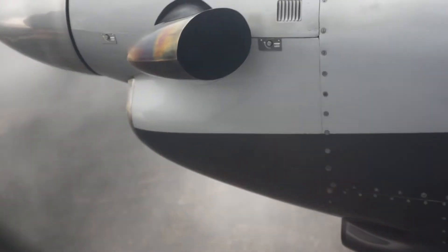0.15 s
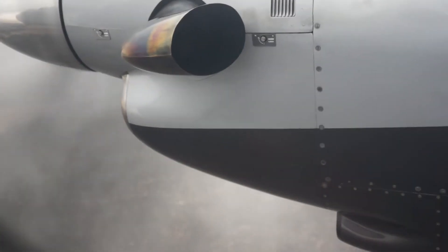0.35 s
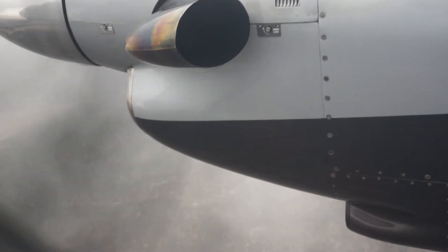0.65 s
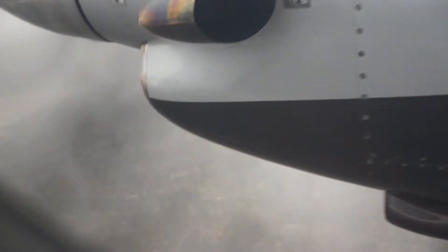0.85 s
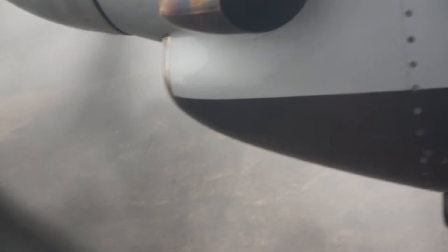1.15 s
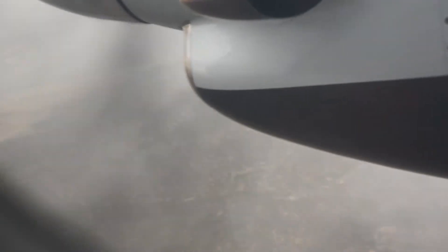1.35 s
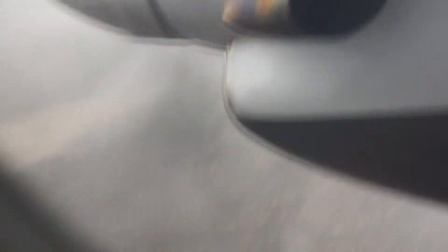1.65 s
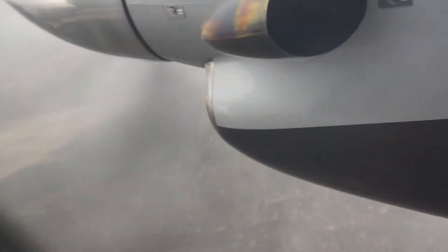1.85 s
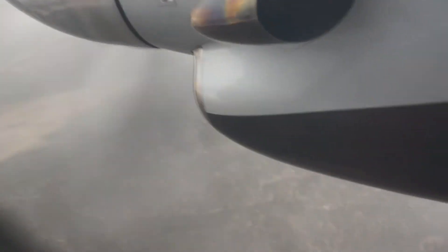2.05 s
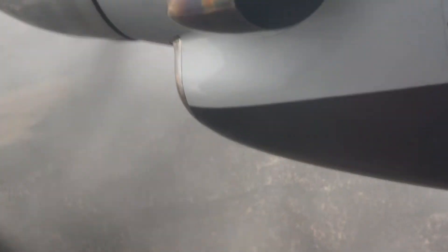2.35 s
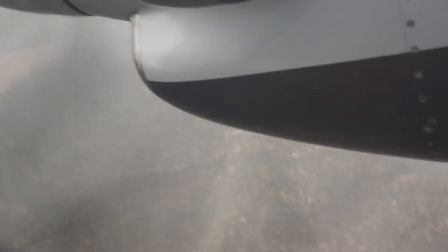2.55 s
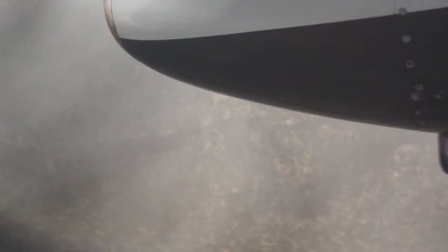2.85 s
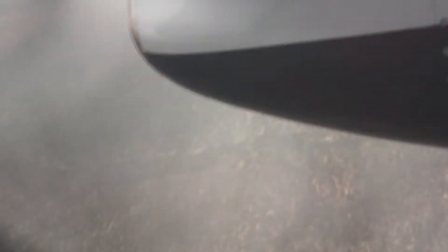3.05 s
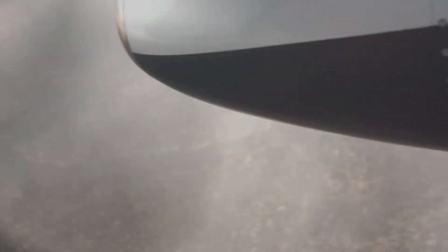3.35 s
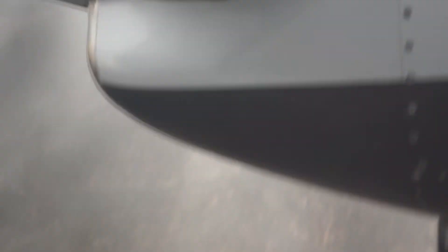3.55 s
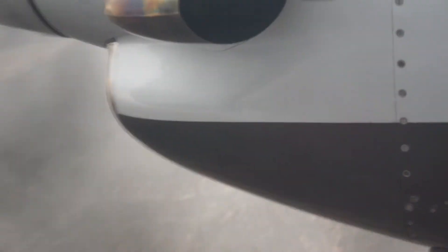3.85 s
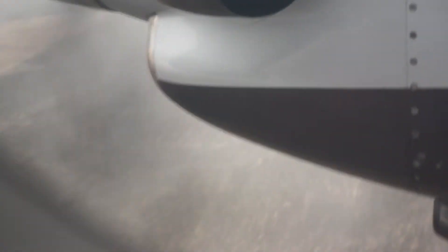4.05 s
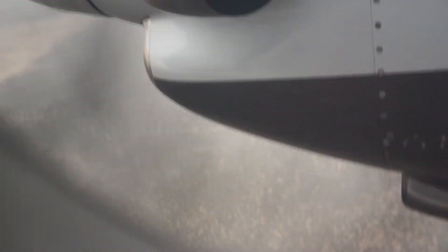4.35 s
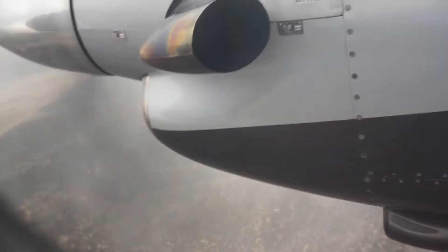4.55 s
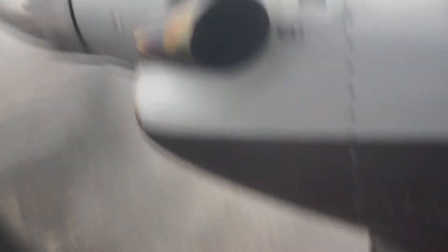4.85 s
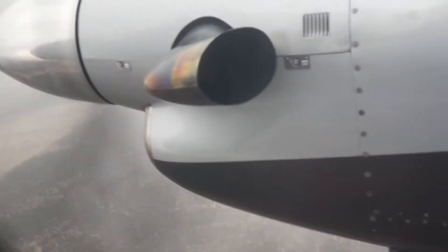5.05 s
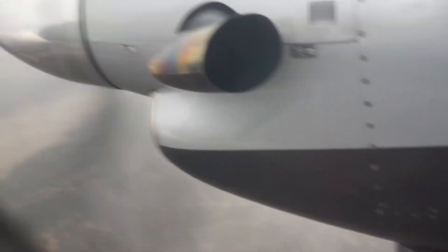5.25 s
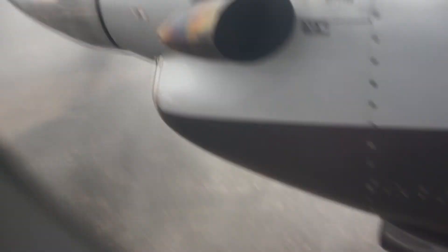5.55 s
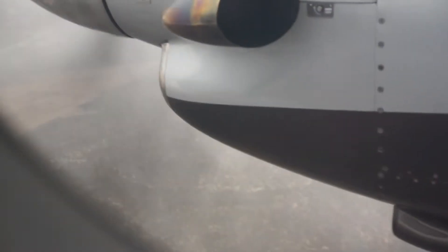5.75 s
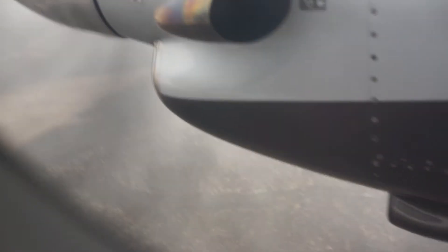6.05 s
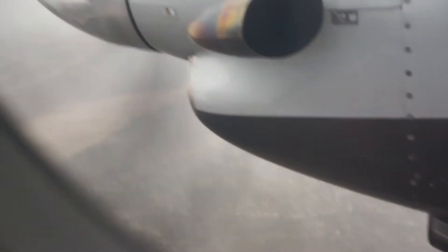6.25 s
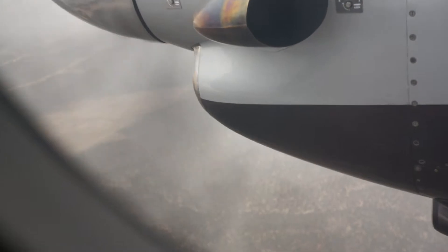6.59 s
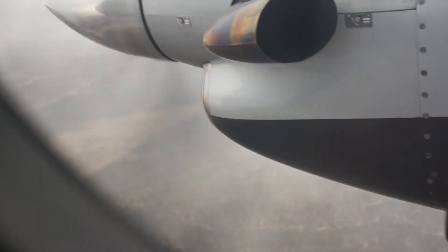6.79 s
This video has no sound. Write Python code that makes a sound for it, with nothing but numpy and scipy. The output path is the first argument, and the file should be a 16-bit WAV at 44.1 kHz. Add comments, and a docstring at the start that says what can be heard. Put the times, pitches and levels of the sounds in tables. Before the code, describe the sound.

Inside a propeller plane, a throbbing bass drone hums continuously under broad muffled slipstream roar and faint hissing cabin air.

```python
"""Inside the cabin of a twin turboprop in cruise, with a hand-held camera at a side window.
The propellers drone at about 105 blade passes a second: tones at its multiples, the upper ones beating.
Shafts and gears hum as blurred tones; the slipstream roars through the wall as shaped noise.
Air hisses in the cabin as rippled noise that changes colour as the camera moves; soft rustles come close by."""
import sys
import numpy as np
from scipy import signal
from scipy.fft import rfft, irfft
from scipy.io import wavfile
from scipy.ndimage import uniform_filter1d

SR = 44100
rng = np.random.default_rng(int(sys.argv[2]) if len(sys.argv) > 2 else 0)


def put_to_file(sound):
    """Save the sound as 16-bit audio at rate SR, in the file named by the first command-line argument."""
    columns = np.atleast_2d(sound).T  # one column per channel
    safe = np.clip(columns, -1, 1)
    whole_steps = np.round(safe * 32767)
    wavfile.write(sys.argv[1], SR, whole_steps.astype(np.int16))


N = 305152
WINDOW, HOP = 2048, 512  # short-time spectra, samples
TIME = np.arange(N) / SR
FRAME_TIME = np.arange(N // HOP + 5) * HOP / SR
BIN_HZ = np.fft.rfftfreq(WINDOW, 1 / SR)

# the governor hunts gently around cruise speed: t/s, blade passes per second before jitter/Hz
BLADE_RATE = [(0.0, 104.86), (1.0, 104.61), (1.6, 105.12), (2.0, 104.83), (2.55, 104.67), (3.1, 105.04),
              (4.15, 104.67), (4.45, 105.17), (5.55, 104.96), (5.9, 105.06), (6.55, 104.61), (6.9, 104.8)]
# the two microphone ports: f/Hz, likeness/0-1, phase by which left leads/rad, left minus right level/dB
PORTS = [(25, .45, 2.5, -6), (90, 0.96, 0.18, -1.5), (170, 0.89, 0.12, -1), (316, 0.96, 0.22, 1.8),
         (372, 0.71, 0.37, -3), (500, 0.94, 0.29, 0), (787, 0.98, 0.9, -2.5), (876, 0.8, 1.48, -0.5),
         (1020, 0.82, 0.54, -1.5), (1180, 0.44, 1.4, -1.5), (1450, 0, 2.1, -2.5), (1930, 0.66, 5.3, .5),
         (2980, 0.27, 6.1, 1.5), (4280, 0.15, 9.4, 0.8), (6500, 0, 11, 1.5), (10000, 0.3, 13.1, 1.4),
         (15000, 0.3, 13.2, 2.3)]


def gain_of(db):
    """Decibels to amplitude."""
    return 10 ** (np.asarray(db) / 20)


def evened(x):
    """Scales to an rms of one."""
    return x / np.sqrt(np.mean(abs(x) ** 2) + 1e-20)


def over_time(rows, t):
    """Every column of a curve table at the times t."""
    s, *columns = np.transpose(rows)
    return [np.interp(t, s, c) for c in columns]


def over_pitch(rows, hz):
    """Every column of a spectrum table at the frequencies hz, interpolated along log frequency."""
    f, *columns = np.transpose(rows)
    return [np.interp(np.log(hz + 1), np.log(f), c) for c in columns]


def wander(rate_hz):
    """Smooth random drift of unit rms, its spectrum a Gaussian roll-off of width rate_hz."""
    count, drift_sr = 4096, 400
    white = rfft(rng.standard_normal(count))
    roll_off = np.exp(-.5 * (np.fft.rfftfreq(count, 1 / drift_sr) / rate_hz) ** 2)
    slow = irfft(white * roll_off)
    return np.interp(TIME, np.arange(count) / drift_sr, evened(slow))


def patches(frame_count, bin_count):
    """A smooth random field of unit rms over time and frequency."""
    field = rng.standard_normal((len(FRAME_TIME), len(BIN_HZ)))
    for _ in range(2):
        field = uniform_filter1d(field, frame_count, axis=0, mode="wrap")
        field = uniform_filter1d(field, bin_count, axis=1, mode="wrap")
    return evened(field)


def tone_at_ports(tone, hz):
    """A complex tone as the two ports pick it up, offset in phase and level."""
    _, lead, balance_db = over_pitch(PORTS, hz)
    side = np.array([[.5], [-.5]])
    at_ports = tone * np.exp(1j * side * lead) * gain_of(side * balance_db)
    return np.sqrt(2) * at_ports.real


def noise_at_ports(size, scatter=0.78):
    """Noise with the given short-time spectrum, more alike at both ports in the bass than in the treble."""
    a, b, c, d = rng.standard_normal((4, len(FRAME_TIME), len(BIN_HZ)))
    same, lead, balance_db = over_pitch(PORTS, BIN_HZ)
    same = np.clip(same, 0, 1)
    # short waves arrive by many paths, so their phase between the ports varies from pitch to pitch
    treble = BIN_HZ ** 4 / (BIN_HZ ** 4 + 1800 ** 4)
    lead = lead + scatter * patches(frame_count=300, bin_count=10) * treble
    left, unlike = a + 1j * b, c + 1j * d
    right = (same * left + unlike * np.sqrt(1 - same ** 2)) * np.exp(-1j * lead)
    spectra = np.array([left * gain_of(balance_db / 2), right * gain_of(-balance_db / 2)]) * size
    noise = signal.istft(spectra.swapaxes(1, 2), nperseg=WINDOW, noverlap=WINDOW - HOP)[1][:, :N]
    return noise / np.sqrt(2 / 3)  # makes up the power lost in overlapping unrelated frames


def unit_in_band(shape, band):
    """Scales a spectrum to unit power within a band."""
    return shape / np.linalg.norm(shape[(BIN_HZ > band[0]) & (BIN_HZ < band[1])])


def band_power(hz, width):
    """A rounded band of unit power."""
    peak = 1 / (1 + ((BIN_HZ - hz) / width) ** 2) ** 4
    return peak / peak.sum()


def airflow_db():
    """Strength of the airflow at the camera, one row per frame; roar and hiss follow it."""
    # airflow about its mean: t/s, level/dB
    air_rows = [(0.0, -0.5), (0.95, 0.5), (1.1, 1.0), (1.6, -0.1), (3.35, 1.6), (3.65, -1), (4.15, -1.4),
                (5.45, -0.2), (5.9, -2.1), (6.0, -0.5), (6.55, 0.6), (6.75, -1.7), (6.9, 0.9)]
    return over_time(air_rows, FRAME_TIME)[0][:, None]


def blade_turns():
    """Count of blade passes; turbulence jitters it slightly."""
    rate, = over_time(BLADE_RATE, TIME)
    return np.cumsum(rate) / SR + 0.0024 * wander(7.3)


def machinery():
    """Wavering shaft and gear tones, blurred on their way through the airframe."""
    # hum of shafts and gears: f/Hz, width/Hz, level/dB
    hums = [(78.7, 3.4, -43.5), (403, 12.4, -39.5), (513.4, 29, -39.5), (634, 51, -38.5), (775, 15.5, -38),
            (942, 9.1, -45), (976, 15, -48)]
    out = np.zeros((2, N))
    for hz, width, level_db in hums:
        blur = evened(wander(width / 2) + 1j * wander(width / 2))
        tone = blur * np.exp(2j * np.pi * hz * TIME)
        out += tone_at_ports(gain_of(level_db) * tone, hz)
    return out


def hiss_bands(fade_s=0.26):
    """Breathy resonances of the air flow come and go with the camera's position."""
    # bands that stand out while the camera holds a position: from t/s, to t/s, f/Hz, width/Hz, level/dB
    bands = [(0, 1.45, 1520, 520, -44.5), (0, 1.4, 3700, 700, -50.5), (0, 3.1, 8280, 150, -54.5),
             (.7, 1.7, 8600, 200, -54), (1.7, 3.5, 9840, 380, -50), (2.4, 3.44, 1300, 500, -45),
             (4.3, 6.92, 2500, 750, -47.5), (4.6, 5.8, 8220, 120, -53), (5.0, 6.92, 7500, 140, -55.5)]
    power = 0
    for start, end, hz, width, level_db in bands:
        inside_s = np.minimum(FRAME_TIME - start, end - FRAME_TIME)
        present = np.clip(inside_s / fade_s + .5, 0, 1)
        power = power + gain_of(level_db) ** 2 * present[:, None] * band_power(hz, width)
    return noise_at_ports(np.sqrt(power))


def hiss(rush_db=-42.0, top_db=-41.4, rush_follow=1.0, top_follow=0.72,
         eddy_db=0.67, shared_ripple_db=1.18, own_ripple_db=1.8):
    """Rushing air; window and wall reflections ripple it, differently at each port, as the camera drifts."""
    # air hiss before its bass is cut: f/Hz, relative level per Hz/dB
    hiss_curve = [(1000, 13.5), (1800, -0.5), (2700, 3), (3600, 1), (4700, -2.5), (6300, -4), (7400, -0.5),
                  (8600, 2), (9700, 1.5), (10500, -2.5), (12000, -0.5), (13700, -3.5), (15000, -7),
                  (15800, -9)]
    bass_cut = BIN_HZ ** 2 / (BIN_HZ ** 2 + 700 ** 2)
    shape = gain_of(over_pitch(hiss_curve, BIN_HZ)[0]) * bass_cut
    # rush and top cross over at 5.8 kHz
    rush = unit_in_band(shape, (2000, 5500)) * gain_of(rush_db + rush_follow * airflow_db())
    top = unit_in_band(shape, (7000, 15000)) * gain_of(top_db + top_follow * airflow_db())
    high = 1 / (1 + (5800 / (BIN_HZ + 1)) ** 6)
    air = (1 - high) * rush + high * top
    shared, *own = (patches(frame_count=70, bin_count=2) for _ in range(3))
    ripple_db = shared_ripple_db * shared + own_ripple_db * np.array(own)
    # turbulence makes the flow flicker, in patches and as a whole
    eddies_db = eddy_db * patches(frame_count=5, bin_count=60)
    flicker = gain_of(.35 * wander(14))
    return flicker * noise_at_ports(air * gain_of(ripple_db + eddies_db))


def rustles():
    """Short swells of noise with no sharp attack, half buried in the roar."""
    # soft rustles and blips beside the camera: centre t/s, length/s, f/Hz, width/Hz, level/dB
    swells = [(0.592, .06, 1310, 100, -36), (0.86, 0.046, 3200, 4500, -38.5),
              (1.135, 0.065, 2500, 4500, -37.5), (2.048, .1, 1230, 110, -36), (4.322, .07, 1400, 700, -39)]
    power = 0
    for s, length, hz, width, level_db in swells:
        swell = np.exp(-(2 * (FRAME_TIME - s) / length) ** 2)
        power = power + gain_of(level_db) ** 2 * swell[:, None] * band_power(hz, width)
    return noise_at_ports(np.sqrt(power))


def slipstream(roar_db=-25, follow=.9, gust_db=.5, buffet_db=0.38):
    """Turbulence shakes the wall panels, which ring in many close modes and pass little of the treble."""
    # roar through the wall before its treble is cut: f/Hz, relative level per Hz/dB
    roar_curve = [(20, -24), (45, -24), (90, -11.5), (135, 0.5), (190, -3), (245, -5.5), (300, -3.5),
                  (375, -9), (520, -9), (700, -10), (810, -8), (880, -18), (1050, -20), (1750, -32.5)]
    treble_cut = 1 / np.sqrt(1 + (BIN_HZ / 2000) ** 8)
    wall = gain_of(over_pitch(roar_curve, BIN_HZ)[0]) * treble_cut
    wall = unit_in_band(wall, (450, 1500))
    modes_rise = BIN_HZ ** 2 / (BIN_HZ ** 2 + 700 ** 2)
    panel_modes_db = 1.4 * patches(frame_count=250, bin_count=1) * modes_rise
    gusts_db = gust_db * patches(frame_count=5, bin_count=20)
    buffet = gain_of(buffet_db * wander(5.3))
    level_db = roar_db + follow * airflow_db() + gusts_db + panel_modes_db
    return buffet * noise_at_ports(wall * gain_of(level_db))


def propellers(turns, slip_hz=.45, slip_jitter=0.022, far_share=0.5, waver=0.31, flutter=0.017):
    """Blade-pass orders; the far propeller slips against the near one, so the overtones beat."""
    # the two lowest orders stand as waves in the cabin and swell and fade at the seat:
    # t/s, order 1 level/dB, order 2 level/dB
    drone = [(0.0, -20, -17), (0.85, -20.9, -17), (1.0, -32.9, -19), (1.5, -20.5, -16),
             (1.95, -18.3, -19.5), (2.25, -16.7, -18.5), (2.6, -26, -17.5), (2.85, -21, -16.5),
             (3.15, -22.4, -17.6), (3.45, -18.7, -15.3), (3.7, -17.8, -18.5), (4.35, -16.5, -17.6),
             (4.8, -24.5, -17.5), (5.2, -21, -18.0), (5.55, -18.1, -16), (5.85, -18.8, -18),
             (6.45, -21.5, -18.5), (6.9, -19.6, -17.5)]
    # the third order, which throbs about once a second: t/s, level/dB
    throb = [(0.0, -41), (0.3, -21.5), (1.5, -35.5), (1.65, -27.6), (2.15, -23.5), (2.5, -35.8),
             (2.7, -29.1), (3.45, -33), (3.6, -25.7), (4.2, -32), (4.35, -40), (4.65, -32), (5.2, -27),
             (5.45, -36.6), (5.75, -23.8), (6.2, -38), (6.5, -25.9), (6.9, -31)]
    # weaker overtones of both propellers: multiple of the blade rate, level/dB
    overtones = [(4, -35), (5, -42.5), (6, -41.5), (7, -56)]
    blade_hz = np.mean(np.array(BLADE_RATE)[:, 1])
    far_turns = turns + slip_hz * TIME + slip_jitter * wander(1.8)
    out = np.zeros((2, N))
    low_orders_db = over_time(drone, TIME) + over_time(throb, TIME)  # three curves
    for k, level_db in enumerate(low_orders_db, 1):
        tone = np.exp(2j * np.pi * k * (turns + rng.random())) * (1 + flutter * wander(15))
        out += tone_at_ports(gain_of(level_db) * tone, k * blade_hz)
    for k, level_db in overtones:
        near, far = (np.exp(2j * np.pi * round(k) * (p + rng.random())) for p in (turns, far_turns))
        beating = evened((near + far_share * far) * (1 + waver * wander(5.6)))
        out += tone_at_ports(gain_of(level_db) * beating, k * blade_hz)
    return out


def scene(chop=0.042):
    """Hum, hiss, rustles, roar and drone; each passing blade pulses the hiss a little."""
    turns = blade_turns()
    air = (hiss() + hiss_bands()) * (1 + chop * np.cos(2 * np.pi * turns))
    return machinery() + air + rustles() + slipstream() + propellers(turns)


def record(dry):
    """The recorder's band limit, a steep low-pass."""
    edge_hz = 15720
    low_pass = signal.firwin(1023, edge_hz, window=("kaiser", 9), fs=SR)
    return signal.oaconvolve(dry, low_pass[None], "same")


dry = scene()
out = record(dry)
put_to_file(out)
```